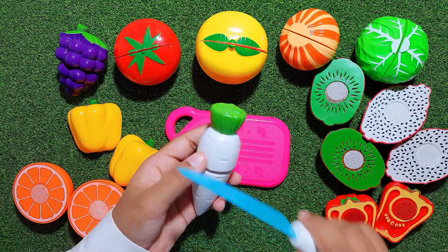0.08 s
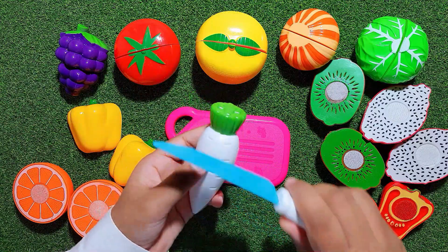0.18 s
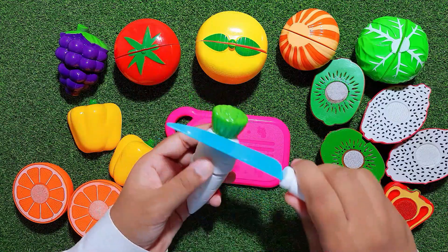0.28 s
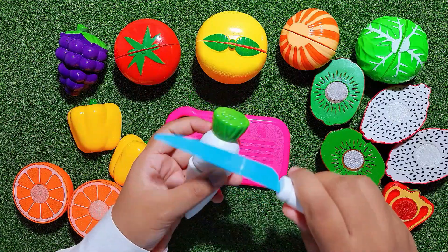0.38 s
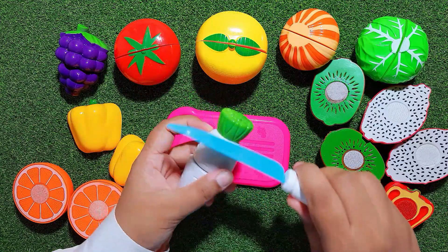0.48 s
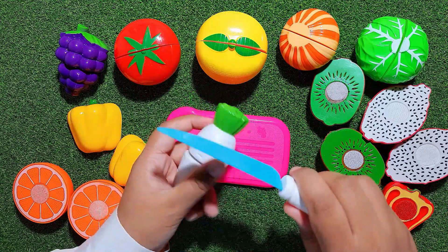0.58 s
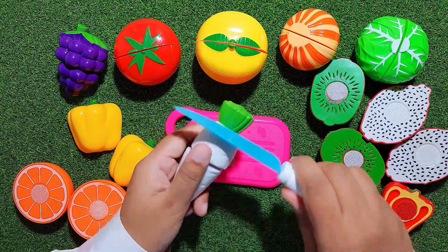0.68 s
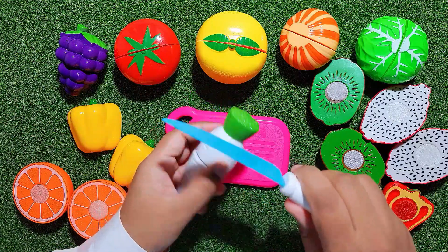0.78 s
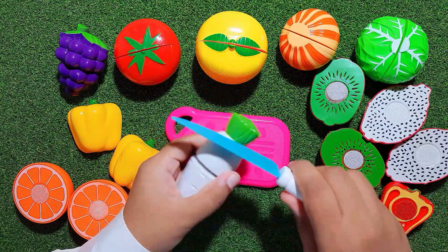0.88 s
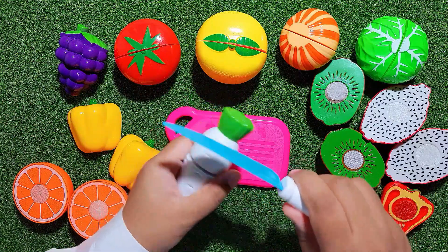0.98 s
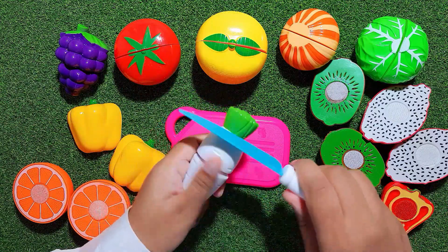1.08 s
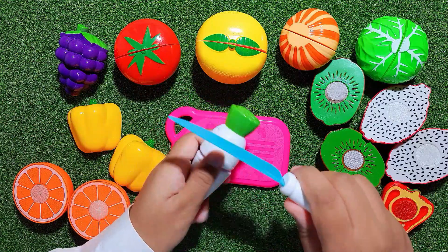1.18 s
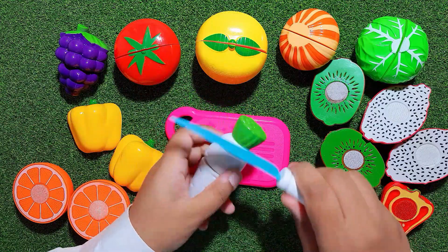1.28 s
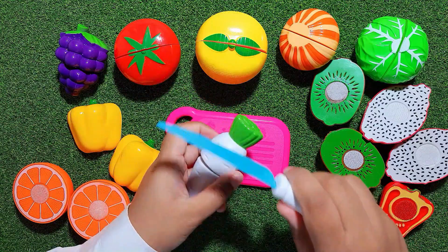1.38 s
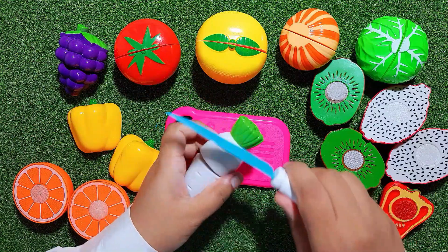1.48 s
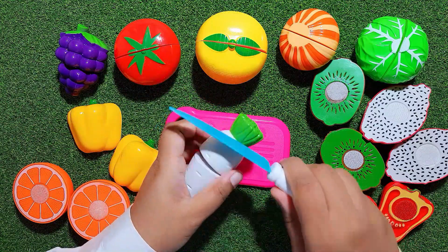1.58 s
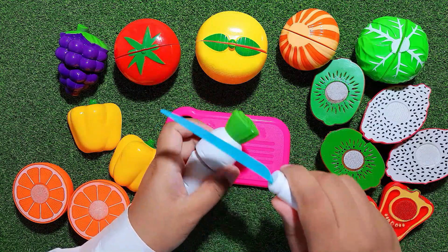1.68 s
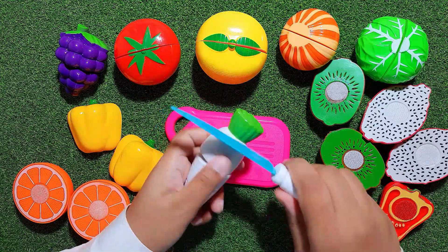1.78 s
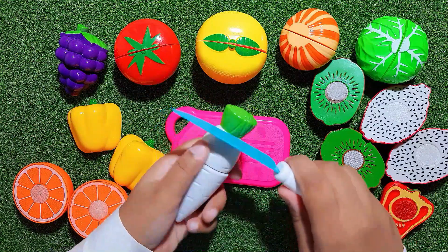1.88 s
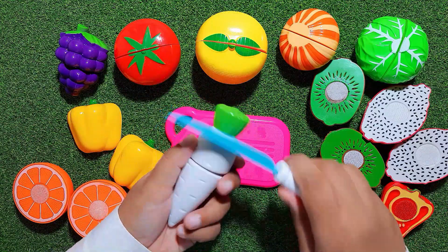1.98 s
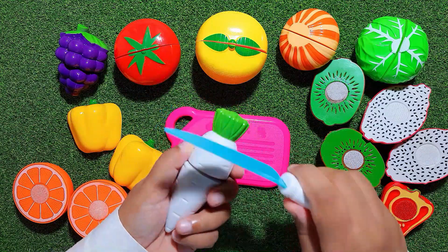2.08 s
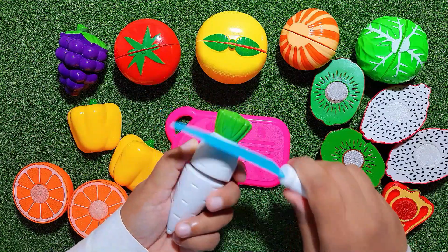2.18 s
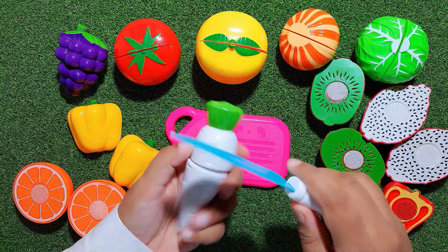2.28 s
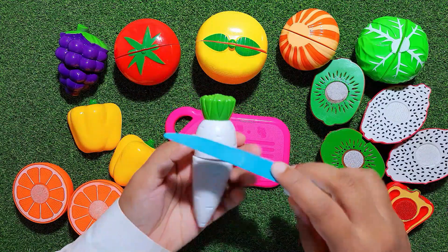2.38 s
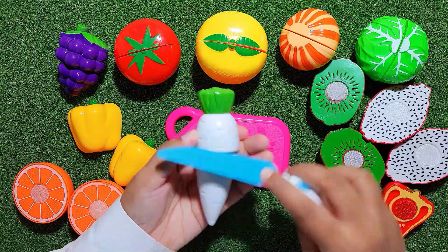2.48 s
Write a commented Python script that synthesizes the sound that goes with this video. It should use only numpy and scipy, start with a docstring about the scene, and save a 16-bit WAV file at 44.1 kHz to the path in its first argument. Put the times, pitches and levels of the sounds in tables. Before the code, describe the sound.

Sharp plastic snaps, each led by a short scratchy hiss, come from a toy knife sawing a toy vegetable near the microphone. After a tiny hook-and-loop rip they come faster, over a small room's rumble and faint insect-like trill.

```python
"""A small room, a stereo microphone; low rumble, hiss and a faint insect-like trill lie under it all.
Close by, a little to the right, a plastic knife saws in the seam of a hollow toy vegetable whose halves
are held by hook-and-loop pads. A brief grainy hiss swells into each sharp snap of the plastic,
and the room answers. From about half a second on, soft swells rise in the rumble.
At 1.4 s a run of hooks rips loose, and the snaps go on, quicker than before."""
import sys
import numpy as np
from scipy import signal
from scipy.fft import rfft, irfft, next_fast_len
from scipy.io import wavfile
from scipy.ndimage import uniform_filter1d, map_coordinates

SR = 44100
rng = np.random.default_rng(int(sys.argv[2]) if len(sys.argv) > 2 else 0)


def master_out(mix):
    """Clip the mix to full scale and print it as 16-bit PCM to the path in sys.argv[1]."""
    frames = np.transpose(np.atleast_2d(mix))
    ceiling = np.clip(frames, -1, 1)
    pcm = np.round(ceiling * 32767).astype(np.int16)
    wavfile.write(sys.argv[1], SR, pcm)


N = 110250
TIME = np.arange(N) / SR

# Spectra of the room tone: frequency_hz, gain_db
RUMBLE_COLOUR = [(20, -2), (40, -20.5), (62, 2), (80, -2), (110, 4), (145, -9), (220, -14.5), (400, -33),
                 (900, -45)]
HISS_COLOUR = [(100, 6.5), (400, 1), (1000, -4.5), (2200, -12.5), (3100, -9.5), (3900, -18), (6300, -6.5),
               (8500, -9), (11000, -14.5), (16000, -18)]
# Bands of the trill: centre_hz, width_hz, gain_db, pulses_per_s
TRILL_BANDS = [(5280, 430, 1, 68), (4920, 140, -5, 130), (7260, 620, -2.5, 44)]
# Rise and fall of the trill: time_s, level_db
TRILL_LEVEL = [(0, -68.5), (.28, -77.5), (.45, -66.5), (1.22, -69), (1.47, -71), (1.94, -71.5),
               (2.33, -66.5), (2.5, -73)]
# Grainy hisses that swell into the snaps: end_s, level_db
LEAD_INS = [(0.2483, -34), (0.4555, -34.5), (0.683, -38.5), (0.8754, -37.5), (1.0742, -38), (1.2685, -40),
            (1.595, -31), (1.7449, -37), (1.8894, -38.5), (2.0327, -32.5), (2.1806, -29), (2.511, -47)]
# Snaps of the plastic: start_s, level_db, bass_db, middle_db, treble_db, ring_hz, left_over_right_db
SNAPS = [(.2496, -24.5, -1, -1.5, 6, 5080, -0.5), (0.4564, -24, 0, -7, 4, 4100, 1),
         (0.4619, -28.5, -7.5, -5, -2, 4070, -9.5), (0.6836, -28, -1, 1.5, 1.5, 3970, -1.5),
         (0.8737, -29.5, 1, -2.5, -0.5, 4410, -2.5), (0.8825, -36, 3, 1, 8, 4550, 0),
         (1.0743, -28.5, 1.5, 1, 6, 4100, -0.5), (1.2678, -29, 1.5, -3, -0.5, 4350, -1),
         (1.4154, -40.5, -9, -24, 2, 4050, -5), (1.4457, -32.5, 0.5, 6, 2, 4220, -2),
         (1.593, -23, -1, 1, 1, 4420, -0.5), (1.7463, -27.5, 0, -0.5, 9, 3720, 0),
         (1.8875, -27, -0.5, -5.5, 1.5, 3680, -0.5), (2.0311, -21.5, -1.5, -4, -0.5, 4190, -2.5),
         (2.0405, -33, 8, 6, 7.5, 5450, 9), (2.178, -28, -2.5, -0.5, 2.5, 3860, -24),
         (2.181, -22.5, 0, -3.5, 0, 4330, -0.5)]
# Swell and fade of the rip: time_s, level_db
RIP_LEVEL = [(1.409, -62), (1.417, -31), (1.429, -24.5), (1.438, -23), (1.45, -35.5), (1.483, -38.5),
             (1.51, -58)]
# Spectra of lead-in hiss, snap and rip: frequency_hz, gain_db
LEAD_IN_COLOUR = [(150, -36), (600, -24.5), (1000, -12), (2900, -14), (4000, -1), (5600, -6.5),
                  (6600, -16.5), (8200, -11), (11000, -20), (16000, -23)]
SNAP_COLOUR = [(100, -31), (280, -20.5), (450, -12.5), (950, -2.5), (1500, -5.5), (2900, -8), (3900, -0.5),
               (5500, 1.5), (6800, -6.5), (8000, -10), (11000, -15.5), (16000, -21.5)]
RIP_COLOUR = [(150, -75), (400, -19), (900, -17), (1800, -20), (3000, -15.5), (3900, -0.5), (4500, -2.5),
              (5600, -7), (7500, -15.5), (11000, -19), (16000, -33)]
# Resonances of the hollow plastic: centre_hz, width_hz, lift_db
SHELL_MODES = [(513, 61, 1), (910, 180, -0.5), (2310, 340, 5), (3920, 115, 1), (4210, 72, 3.5),
               (4956, 90, 1.5), (5370, 89, 3.5), (6860, 53, 3.5), (7910, 170, 7), (10030, 180, -7)]
# Stereo width of the toy at the microphone: frequency_hz, side_gain_db
TOY_WIDTH = [(300, -7), (1000, -4.5), (2500, -0.5), (6000, 1), (15000, 3)]
# Decay of the room: frequency_hz, t60_s
ROOM_DECAY = [(300, 0.25), (1000, 0.1379), (2500, 0.2633), (4500, 0.25), (9000, 0.2059), (15000, 0.23)]
# Spectrum of the room's answer: frequency_hz, gain_db
ROOM_COLOUR = [(200, 1), (600, 3), (1500, 0), (4200, -4.5), (8000, -3.5), (15000, -2.5)]
# Soft swells in the rumble: peak_s, level_db, pitch_hz
LOW_SWELLS = [(0.471, -50, 62.4), (0.592, -55, 109), (0.871, -56, 70), (1.071, -50, 104), (1.18, -49, 61),
              (1.45, -46, 110), (1.902, -46.5, 107.5), (2.091, -52, 66), (2.448, -56.5, 65.4)]

RUMBLE_PAN_DB, TOY_PAN_DB = 2.5, -1.5  # left over right


def amp(db):
    """Decibels to gain."""
    return 10 ** (np.asarray(db) / 20)


def unit(x):
    """Scale to rms 1."""
    return x / np.sqrt(np.mean(x ** 2) + 1e-20)


def along(points, hz):
    """Read (Hz, value) points on a log axis."""
    freqs, values = np.transpose(points)
    return np.interp(np.log(hz + 1), np.log(freqs + 1), values)


def wobble(rate):
    """A smooth random curve, rate knots a second."""
    return map_coordinates(rng.standard_normal(int(N * rate / SR) + 4), [TIME * rate])


def filtered(x, response):
    """x with its spectrum multiplied by response(Hz)."""
    size = next_fast_len(N + SR // 2)
    return irfft(rfft(x, size) * response(np.fft.rfftfreq(size, 1 / SR)), size)[..., :N]


def coloured(x, curve, size=4096):
    """x through a minimum-phase filter whose gain in dB is curve(Hz)."""
    cepstrum = irfft(np.log(amp(curve(np.fft.rfftfreq(size, 1 / SR)))))
    cepstrum[1:size // 2] *= 2
    cepstrum[size // 2 + 1:] = 0
    impulse = irfft(np.exp(rfft(cepstrum)))
    return signal.fftconvolve(x, impulse[None], axes=1)[:, :x.shape[1]]


def whitened(x, bins):
    """x with the chance hills and dips of its spectrum levelled; timing is kept."""
    spectrum = rfft(x)
    power = np.abs(uniform_filter1d(np.abs(spectrum) ** 2, bins, axis=-1))
    return irfft(spectrum / np.sqrt(power + 1e-20), x.shape[-1])


def peak(hz, centre, width):
    """A resonance peak of height 1."""
    return 1 / (1 + (2 * (hz - centre) / width) ** 2)


def stereo_noise(count, spread):
    """White noise: alike in both channels at spread 0, independent at 1."""
    noise = rng.standard_normal((3, count))
    return np.sqrt(1 - spread ** 2) * noise[0] + spread * noise[1:]


def pan(db):
    """Channel gains with the left db above the right."""
    return unit(amp(np.array([[db], [-db]]) / 2))


def add(out, x, start_s):
    """Mix x into out from start_s."""
    i = round(start_s * SR)
    out[:, i:i + x.shape[1]] += x[:, :N - i]


def room_tone(rumble_db=-56, hiss_db=-66.5):
    """Low rumble toward the left, faint hiss toward the right, both wavering slightly."""
    rumble = unit(filtered(stereo_noise(N, spread=1), lambda hz: amp(along(RUMBLE_COLOUR, hz))))
    hiss = unit(filtered(stereo_noise(N, spread=1), lambda hz: amp(along(HISS_COLOUR, hz))))
    rumble *= amp(rumble_db + wobble(7.1))
    hiss *= amp(hiss_db + 0.65 * wobble(4.75))
    return rumble * pan(RUMBLE_PAN_DB) + hiss * pan(-4.5)


def trill(depth=0.29, waver=0.102):
    """Narrow high bands of noise flutter quickly, like insects far off."""
    out = np.zeros((2, N))
    for centre, width, db, rate in TRILL_BANDS:
        noise = stereo_noise(N, spread=0.93)
        band = unit(filtered(noise, lambda hz: (1 + (2 * (hz - centre) / width) ** 4) ** -0.5))
        cycles = np.cumsum(rate * (1 + waver * wobble(10))) / SR
        flutter = 1 + depth * np.sin(2 * np.pi * cycles)
        out += amp(db + 0.5 * wobble(12)) * band * flutter
    return out * amp(np.interp(TIME, *np.transpose(TRILL_LEVEL)))


def grains(count, per_s, colour, scatter_db, fuzz_db):
    """Tiny random ticks over a fuzz of noise; rms 1."""
    onsets = rng.random(count) < per_s / SR
    ticks = onsets * amp(scatter_db * np.clip(rng.standard_normal(count), -2, 2))
    texture = (unit(ticks) + amp(fuzz_db)) * stereo_noise(count, spread=0.91)
    return unit(coloured(whitened(texture, bins=60), colour)) * pan(1)


def shell(hz):
    """Lift in dB from the resonances of the hollow plastic."""
    return sum(db * peak(hz, centre, width) for centre, width, db in SHELL_MODES)


def contact(hz, snap, ring_db=9):
    """Colour in dB of the spot the blade touches: its balance and the resonance it favours."""
    bass, middle, treble, ring_hz = snap[2:6]
    balance = [(1200, bass), (2200, middle), (3600, 0), (6000, 0), (8500, treble)]
    return along(balance, hz) + shell(hz) + ring_db * peak(hz, ring_hz, width=198)


def lead_in_hiss(rise_db=32, rise_s=0.025, bend=2.06, tint=0.58):
    """A brief grainy hiss swells into each snap, takes some of its colour and stops there."""
    out = np.zeros((2, N))
    remaining_s = TIME[:SR // 20][::-1]
    swell = amp(-rise_db * (remaining_s / rise_s) ** bend)
    for end_s, db in LEAD_INS:
        nearest = min(SNAPS, key=lambda snap: abs(snap[0] - end_s))
        colour = lambda hz: along(LEAD_IN_COLOUR, hz) + tint * contact(hz, nearest)
        hiss = grains(len(swell), per_s=6000, colour=colour, scatter_db=1.5, fuzz_db=-5)
        add(out, amp(db) * swell * hiss, end_s - remaining_s[0])
    return out


def snaps(clatter_t60_s=0.02, crack_t60_s=0.0021, echo_s=0.0019, echo_db=-12.5, boost_db=2):
    """The blade snaps against the shell: a crack, a brief clatter and an echo off the table."""
    out, t = np.zeros((2, N)), TIME[:SR // 20]
    clatter = amp(-60 * t / clatter_t60_s)
    crack = amp(-1.5 - 60 * t / crack_t60_s)
    direct = clatter + crack
    echo = amp(echo_db) * np.interp(t - echo_s, t, direct, left=0)
    blow = np.hypot(direct, echo)
    lead = 128  # samples of space ahead of the attack
    for row in SNAPS:
        start_s, db, *_, pan_db = row
        force = np.pad(blow * stereo_noise(len(t), spread=0.67), ((0, 0), (lead, 0)))
        snap = coloured(whitened(force, bins=45), lambda hz: along(SNAP_COLOUR, hz) + contact(hz, row))
        snap *= np.sqrt(0.005 * SR / np.sum(snap ** 2, axis=1, keepdims=True))  # energy of 5 ms at rms 1
        add(out, amp(db + boost_db) * pan(pan_db) * snap, start_s - lead / SR)
    return out


def room_answer(toy, onset_s=0.0025, gain_db=-5):
    """The walls return a short diffuse tail that varies from moment to moment as the hands move."""
    out = np.zeros((2, N))
    for moment in np.array_split(np.arange(N), 12):
        hz, t, noise = signal.stft(stereo_noise(SR // 3, spread=0.94), SR, nperseg=256)
        decay = amp(-60 * t / along(ROOM_DECAY, hz)[:, None])
        tail = signal.istft(noise * decay, SR, nperseg=256)[1]
        tail *= 1 - np.exp(-(TIME[:tail.shape[1]] / onset_s) ** 2)
        tail /= np.linalg.norm(tail[0])
        add(out, signal.fftconvolve(toy[:, moment], tail, axes=1), moment[0] / SR)
    return amp(gain_db) * coloured(out, lambda hz: along(ROOM_COLOUR, hz))


def low_swells(half_width_s=0.034):
    """Faint low tones of a few cycles each rise and sink in the rumble."""
    out = np.zeros((2, N))
    for peak_s, db, hz in LOW_SWELLS:
        t = TIME - peak_s
        swell = amp(db) * np.exp(-(t / half_width_s) ** 2)
        out += swell * np.sin(2 * np.pi * hz * t + rng.normal(0, 1, (2, 1)))
    return out * pan(RUMBLE_PAN_DB)


def rip():
    """A run of hooks tears loose, each with a tiny tick, over a fuzz of rubbing fibres."""
    level_db = np.interp(TIME, *np.transpose(RIP_LEVEL), left=-120, right=-120)
    colour = lambda hz: along(RIP_COLOUR, hz) + shell(hz)
    return amp(level_db) * grains(N, per_s=3000, colour=colour, scatter_db=2.5, fuzz_db=-8)


def at_microphone(toy, left_lag_s=0.0001):
    """The toy sits a little to the right, so the left channel lags; its lows are narrower in stereo."""
    left, right = toy
    mid = (left + right) / 2
    side = filtered((left - right) / 2, lambda hz: amp(along(TOY_WIDTH, hz)))
    placed = np.array([mid + side, mid - side]) * pan(TOY_PAN_DB)
    delay_s = np.array([[0.5], [-0.5]]) * left_lag_s
    return filtered(placed, lambda hz: np.exp(-2j * np.pi * hz * delay_s))


def scene():
    """The toy in front, the room's answer around it, the quiet background behind."""
    toy = at_microphone(snaps() + lead_in_hiss() + rip())
    return toy + room_answer(toy) + trill() + room_tone() + low_swells()


def record(dry, top_hz=16100):
    """The recorder keeps nothing above its band limit."""
    return filtered(dry, lambda hz: hz < top_hz)


dry = scene()
out = record(dry)
master_out(out)
```